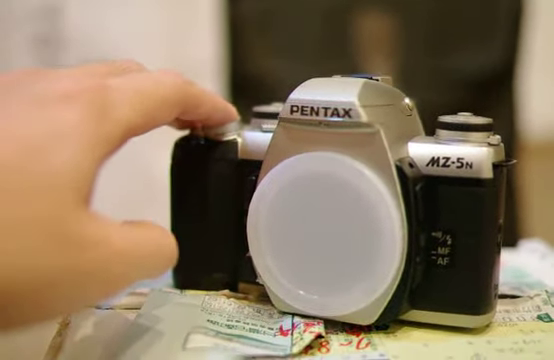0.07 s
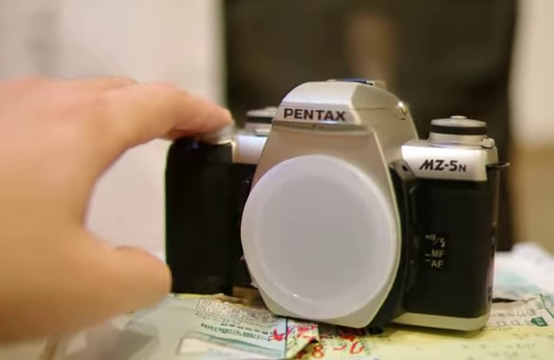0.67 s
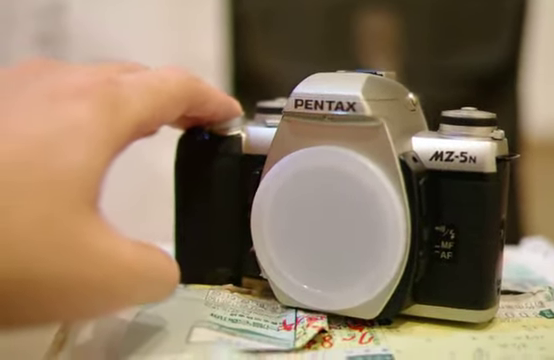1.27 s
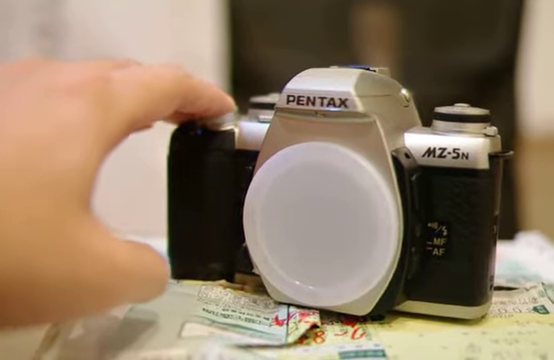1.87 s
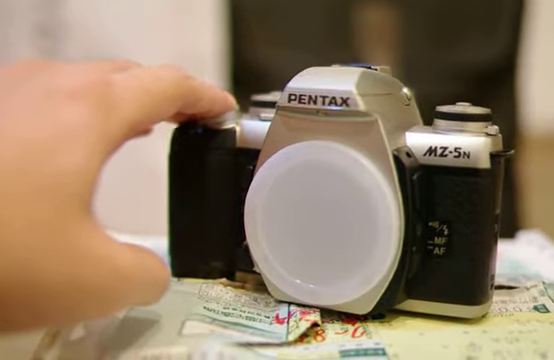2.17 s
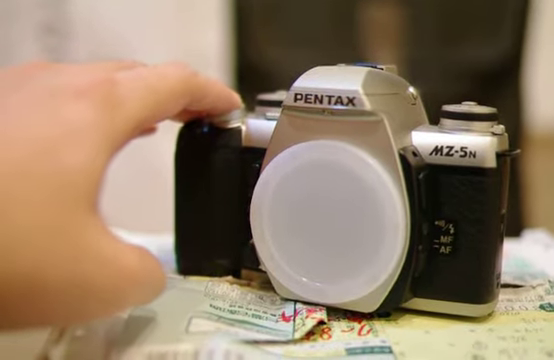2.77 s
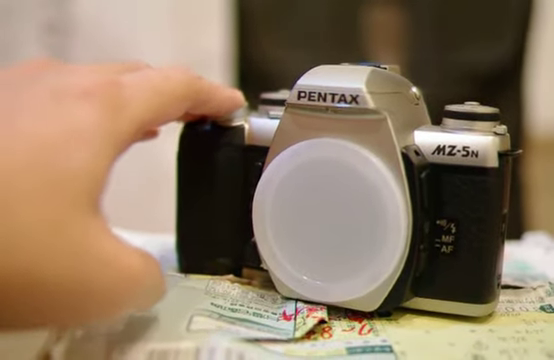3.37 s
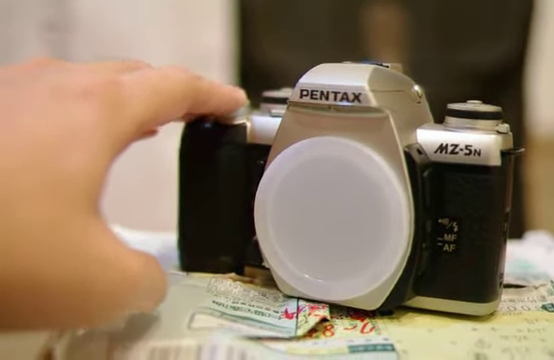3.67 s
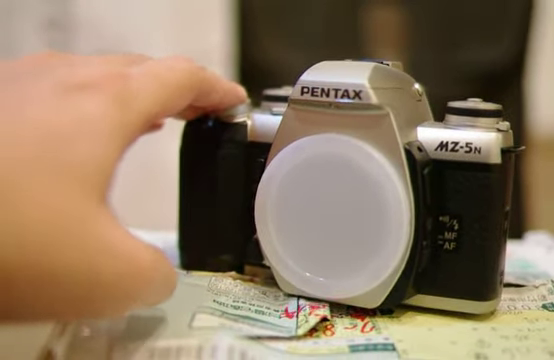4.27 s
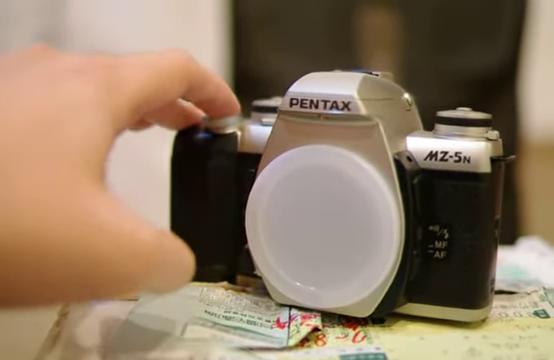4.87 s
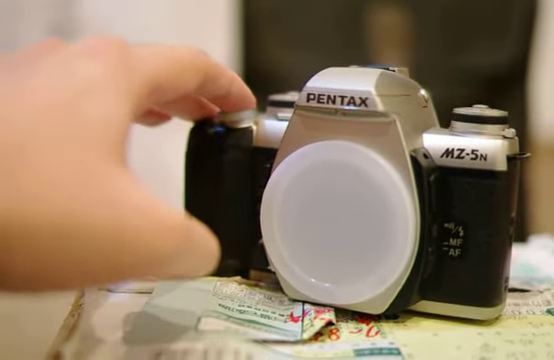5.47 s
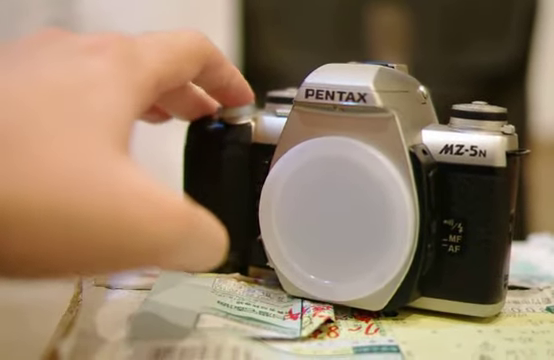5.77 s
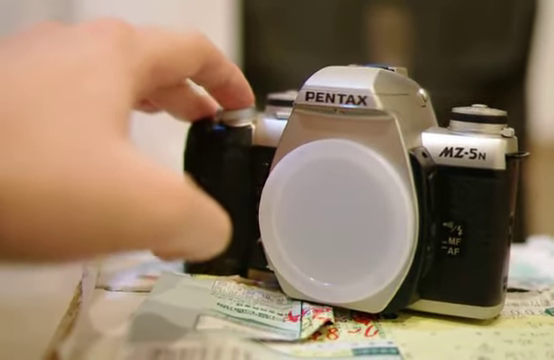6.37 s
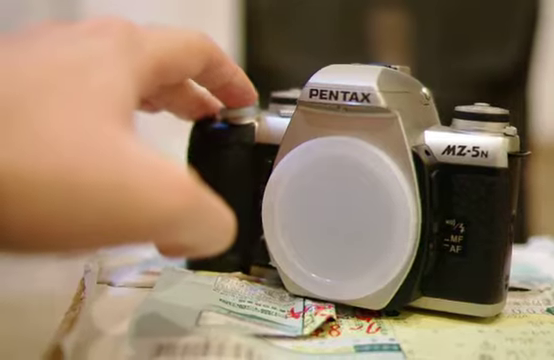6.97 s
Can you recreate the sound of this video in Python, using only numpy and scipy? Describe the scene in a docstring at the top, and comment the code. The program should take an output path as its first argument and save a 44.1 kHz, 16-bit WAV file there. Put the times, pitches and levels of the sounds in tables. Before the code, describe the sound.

Four close, unevenly spaced camera shutter snaps with short whining film winds, over a soft, steady rush of air.

```python
"""A small quiet room, the microphone close to a motor-driven film SLR on a table. It fires four times.
In each cycle a latch lets go, the mirror swings up, the shutter snaps and the mirror slaps down,
then the motor winds on with whining gears until it runs into its stop. Each blow rings the part
it hits, and jolts rock the body on the table. Between the second and third shots the release
button ticks faintly under the finger. Behind it all is a steady rush of air."""
import sys
import numpy as np
from scipy import signal
from scipy.fft import rfft, irfft
from scipy.io import wavfile
from scipy.ndimage import uniform_filter1d

SR = 44100
rng = np.random.default_rng(int(sys.argv[2]) if len(sys.argv) > 2 else 0)


def file_out(sig):
    """Save sig as 16-bit WAV at sys.argv[1]."""
    # one column per channel
    cols = np.atleast_2d(sig).T
    # limit, then scale
    lim = np.clip(cols, -1, 1)
    pcm = np.round(lim * 32767).astype(np.int16)
    wavfile.write(sys.argv[1], SR, pcm)


N = 309582
FFT_SIZE = 8192
LEAD_S, CYCLE_S = .2, .7  # times within a cycle count from the mirror's landing, LEAD_S into it


def undb(db):
    """Decibels to gain."""
    return 10 ** (np.asarray(db) / 20)


def unit(x):
    """Scale to an rms of 1."""
    return x / np.sqrt(np.mean(x ** 2))


def freqs(size):
    """Bin frequencies of a transform, kept above zero."""
    return np.maximum(np.fft.rfftfreq(size, 1 / SR), 1)


def add(out, x, start_s):
    """Mix x into out from a given time on."""
    k = int(round(start_s * SR))
    x = x[max(-k, 0):len(out) - k]
    out[max(k, 0):max(k, 0) + len(x)] += x


def walk(size, count):
    """Random wander, smoothed over count samples, with an rms of 1."""
    return unit(uniform_filter1d(rng.standard_normal(size), size=count))


def fall(t, from_s, db_per_s):
    """Gain that holds at 1 until a given time, then falls steadily."""
    return undb(-db_per_s * np.maximum(t - from_s, 0))


def drive(t, start_s, length_s, fall_db_per_s, engage_s=.0078):
    """Envelope of a driven part: it engages, holds and coasts down."""
    return np.clip((t - start_s) / engage_s, 0, 1) * fall(t, start_s + length_s, fall_db_per_s)


def contacts(size, spread_db):
    """Dense tiny contacts of very unequal strength."""
    return unit(rng.standard_normal(size) * undb(spread_db * rng.standard_normal(size)))


def ring(push, modes, tilt_db=0, knee_hz=2000, lowest_hz=150):
    """A push rings a part's resonances; harder contacts lift the treble by tilt_db per octave."""
    f = freqs(FFT_SIZE)
    power = sum(undb(db) ** 2 / (1 + ((f * f - hz * hz) / (f * width)) ** 2 / 2) ** 2
                for hz, width, db in modes)
    power /= 1 + (lowest_hz / f) ** 4  # almost no bass comes through
    gain = np.sqrt(power) * undb(tilt_db * np.log2(np.maximum(f, knee_hz)))
    # minimum phase, so nothing rings before the push
    cepstrum = irfft(np.log(gain / gain.max() + 1e-5))
    cepstrum[1:FFT_SIZE // 2] *= 2
    cepstrum[FFT_SIZE // 2 + 1:] = 0
    response = irfft(np.exp(rfft(cepstrum)))
    return signal.fftconvolve(push, response / np.linalg.norm(response))[:len(push)]


def strike(t, blows, modes, chatter_db, slop_s=.00015):
    """Each blow is one hard contact and a dying chatter of loose parts, ringing the resonances."""
    out = np.zeros(len(t))
    age = np.arange(FFT_SIZE // 2) / SR
    for s, db, chatter_s, tilt_db in blows:
        chatter = contacts(len(age), spread_db=2) * np.exp(-age / chatter_s)
        push = chatter * undb(chatter_db)
        push[0] -= 1  # the hard contact
        sound = ring(push, modes, tilt_db)
        sound /= np.linalg.norm(sound)  # springs deliver the same energy every time
        add(out, undb(db) * sound, s + LEAD_S + slop_s * rng.standard_normal())
    return out


# Room tone, all around the microphone. Each row: frequency in Hz, relative spectral level in dB.
AIR_SPECTRUM = [(25, -50), (50, -20.5), (86, -16), (110, -6.5), (150, -6.5), (185, -0.5), (350, 0),
                (540, -2), (800, -1.5), (1150, -6), (2100, -8.5), (5000, -15.5), (13900, -23.5),
                (15800, -29)]
# The ducts, faint in the room tone. Each row: resonance in Hz, width in Hz, relative level in dB.
DUCT_MODES = [(664, 63, -0.5), (870, 58, -2), (1375, 66, -4.5), (2291, 80, 1), (2540, 89, -4),
              (3230, 110, -6), (3600, 120, -10.5), (5470, 73, -10)]


def room_tone(rush_db=-53.5, duct_db=-63):
    """Air rushes steadily, faintly coloured by narrow duct resonances."""
    hz, db = np.transpose(AIR_SPECTRUM)
    colour = undb(np.interp(np.log(freqs(N)), np.log(hz), db))
    rush = irfft(rfft(rng.standard_normal(N)) * colour, N)
    ducts = ring(rng.standard_normal(N), DUCT_MODES)
    return undb(rush_db) * unit(rush) + undb(duct_db) * ducts


# The latch, close to the microphone, after a magnet's tick. Each row: start in seconds, relative energy in dB,
# # chatter time constant in seconds, treble tilt in dB per octave.
LATCH_CLICKS = [(-.138, -28, .001, -1), (-.0924, -9, 0.0019, 2.5), (-.089, -17, 0.005, 2)]
# Its ring. Each row: resonance in Hz, width in Hz, relative level in dB.
LATCH_MODES = [(748, 85, -14.5), (1070, 180, 4), (1640, 690, -6), (2245, 120, 6), (2950, 500, -9),
               (4428, 940, -13), (6200, 210, -13), (7400, 280, -11), (10150, 2000, -11.5),
               (12100, 867, -7.5)]


def latch(t):
    """A magnet ticks to open the cycle, then the latch lets go with small clicks."""
    return strike(t, LATCH_CLICKS, LATCH_MODES, chatter_db=-10)


# The gears, close up: they take up slack, lift the mirror, idle, spin up, wind, ease off and run out.
# Each row: start in seconds, length in seconds, relative level in dB, swell over the run in dB,
# sharpness of the tooth contacts in dB.
GEAR_TRAIN_RUNS = [(-.109, .018, -49, -4, 2), (-.089, 0.052, -34.5, 5, -0.5), (-.03, 0.049, -44, 3, 4),
                   (.024, .026, -43, 2, -6), (0.047, 0.09, -37.5, 0, 3), (0.136, 0.034, -39, 4.5, 0),
                   (0.186, 0.036, -35.5, -1, -1.5)]
# The housing around them. Each row: resonance in Hz, width in Hz, relative level in dB.
HOUSING_MODES = [(210.5, 34.4, -2.5), (295, 37, -6), (335, 22, -7), (490, 24, -12), (630, 66, -6),
                 (766, 104, -6), (985, 67, 3), (1208, 173, 1.5), (1490, 280, -3), (2005, 70, -2.5),
                 (2240, 1140, -5.5), (2396, 87, -0.5), (3190, 230, -5), (3900, 159, -12.5),
                 (4180, 260, -8.5), (4907, 860, -13), (6170, 410, -13), (7040, 438, -16),
                 (9340, 3900, -15.5), (11560, 1400, -9.5), (12140, 384, -7), (13226, 533, -12.5)]


def gear_train(t, coast_db_per_s=482, dulling_db_per_s=200):
    """Teeth rattle the housing in each run, swelling as a spring tightens and dulling as they coast."""
    low_gain, treble_gain = np.zeros(len(t)), np.zeros(len(t))
    for start_s, length_s, db, swell_db, sharp_db in GEAR_TRAIN_RUNS:
        progress = np.clip((t - start_s) / length_s, 0, 1)
        force = undb(db + swell_db * (progress - .5)) * drive(t, start_s, length_s, coast_db_per_s)
        sharpness = undb(sharp_db) * fall(t, start_s + length_s, dulling_db_per_s)
        low_gain = np.hypot(low_gain, force)
        treble_gain = np.hypot(treble_gain, force * sharpness)
    rattle = ring(contacts(len(t), spread_db=4), HOUSING_MODES)
    low = signal.sosfiltfilt(signal.butter(2, 4000, fs=SR, output="sos"), rattle)
    return low_gain * low + treble_gain * (rattle - low)


# The body against the table, near the microphone. Each row: start in seconds, relative level in dB.
BODY_JOLTS = [(-.081, -41.5), (-.045, -49), (.002, -33.5), (.127, -40.5), (0.164, -50)]


def table_thump(t, hz=208, t60=.12, rise_s=.0044):
    """The body rocks on the table in one low mode after each jolt."""
    out = np.zeros(len(t))
    for s, db in BODY_JOLTS:
        age = np.maximum(t - s, 0)
        detune = 1 + .0093 * rng.standard_normal()
        envelope = (1 - np.exp(-age / rise_s)) * np.exp(-np.log(1000) * age / t60)
        out += undb(db) * envelope * np.sin(2 * np.pi * hz * detune * age)
    return out


# The shutter, crisp at this short distance. Each row: start in seconds, relative energy in dB,
# chatter time constant in seconds, treble tilt in dB per octave.
CURTAIN_SNAPS = [(-.053, -19, .003, 5), (-.0473, -1, 0.0015, 0.9), (-.0457, -7.5, 0.0017, -2),
                 (-.041, -11, 0.0068, 11), (-.032, -11, .004, 11)]
# Its ring. Each row: resonance in Hz, width in Hz, relative level in dB.
SHUTTER_MODES = [(212, 110, -21), (357, 170, -15), (570, 61, -28), (805, 87, -8), (910, 74, -18),
                 (1100, 271, -14), (2090, 530, -1.5), (2770, 119, -5), (3330, 250, 0.5), (3968, 240, -10),
                 (4840, 330, 2), (6020, 200, -1.5), (8250, 2400, -11), (9020, 250, -4), (9800, 580, -0.5),
                 (11850, 1900, -1.5), (13035, 237, -6)]


def shutter(t):
    """The two curtains snap across and their blades shiver."""
    return strike(t, CURTAIN_SNAPS, SHUTTER_MODES, chatter_db=-5)


# The mirror, a deeper clack just in front of the microphone. Each row: start in seconds,
# relative energy in dB, chatter time constant in seconds, treble tilt in dB per octave.
MIRROR_SLAPS = [(-.0001, -2.5, 0.00055, -2.5), (.0035, -8, 0.0018, 3), (.0052, -9.5, 0.003, -1),
                (.012, -13.5, 0.0045, -2), (.131, -15, .0015, 5), (.224, -21.5, 0.0052, -6)]
# Its ring. Each row: resonance in Hz, width in Hz, relative level in dB.
MIRROR_MODES = [(206.7, 22, 5.5), (296, 42, -11), (314, 43, -12), (469, 33, -3.5), (556, 30, -7),
                (747, 105, -4), (1003, 93, -5.5), (1158, 130, -4.5), (2120, 930, -2), (2850, 140, -5.5),
                (2982, 64, -10), (3170, 140, -3), (4262, 130, -17), (4700, 270, -10), (6221, 700, -16),
                (9653, 1800, -14), (11936, 1500, -15.5)]


def mirror(t):
    """The mirror lands and bounces; later its linkage is cocked again."""
    return strike(t, MIRROR_SLAPS, MIRROR_MODES, chatter_db=-17)


# The winder's whine, close up. Each row: multiple of the shaft rate, relative level in dB.
WHINE_TONES = [(5, -13), (8, -7.5), (9, -4.5), (12, -6), (24, -5.5), (36, -8), (48, -0.5)]


def motor(t, start_s=.05, length_s=.074, whine_db=-40.5):
    """The winding motor sags under the film's pull; its gears whine on multiples of the shaft rate."""
    free_hz, sag_hz, pull_after_s, pull_width_s = 265.5, 19, .043, .042
    flutter, roughness, slip_rad, runout, pinion_teeth = .0077, .47, .52, .2, 12
    age = t - start_s
    pull = np.exp(-((age - pull_after_s) / pull_width_s) ** 2)
    shaft_hz = (free_hz - sag_hz * pull) * (1 + flutter * walk(len(t), count=60))
    turns = np.cumsum(shaft_hz) / SR
    pinion_gain = undb(7) * fall(age, from_s=.04, db_per_s=550)  # sings out early, then beds in
    whine = np.zeros(len(t))
    for multiple, db in WHINE_TONES:
        # play between the teeth makes each tone shake in phase and strength
        phase = 2 * np.pi * (multiple * turns + rng.random()) + slip_rad * walk(len(t), count=200)
        strength = undb(db) * (1 + roughness * walk(len(t), count=160))
        if multiple == pinion_teeth:
            strength *= pinion_gain
        whine += strength * np.sqrt(2) * np.sin(phase)
    whine *= 1 + runout * np.sin(2 * np.pi * turns)  # an off-centre pinion presses harder once a turn
    return whine * undb(whine_db) * drive(t, start_s, length_s, fall_db_per_s=600)


# The pawl, close up, scraping before the stop and settling after it. Each row: start in seconds,
# relative energy in dB, chatter time constant in seconds, treble tilt in dB per octave.
PAWL_SCRAPES = [(.123, -7, 0.015, -10.5), (0.206, -16, .005, 1.5), (0.219, -23, .005, -8),
                (0.265, -20, 0.0013, -5)]
# The ring of the stop. Each row: resonance in Hz, width in Hz, relative level in dB.
STOP_MODES = [(312, 30, -2.5), (701, 36, -15.5), (803, 41, -23), (990, 121, -10.5), (1224, 91, -7.5),
              (1475, 97, -1.5), (1790, 490, 0.0), (2930, 1140, -5.5), (5050, 200, -9), (6140, 900, -17),
              (7240, 230, -10), (9984, 3000, -15.5), (10800, 560, -8), (12100, 482, -6), (13135, 604, -20)]


def winder_stop(t, crash_s=.1752, gap_s=.0025, chatter_s=.0041):
    """The pawl scrapes and the winder judders into its stop, each blow harder and duller than the last."""
    first_db, swell_db = -5.5, .5
    tilt_db, dulling_db = 1.6, .94  # per octave
    judder = [(crash_s + k * gap_s, first_db + k * swell_db, chatter_s, tilt_db - k * dulling_db)
              for k in range(5)]
    return strike(t, PAWL_SCRAPES + judder, STOP_MODES, chatter_db=-11)


# The release button, faint even this close.
# Each row: start in seconds into the scene, relative energy in dB.
RELEASE_TICKS = [(2.892, -24.5), (3.628, -35), (3.925, -26)]


def release_button(decay_s=.0065):
    """The button creaks under the finger in short soft ticks that ring the housing."""
    push = np.zeros(N)
    age = np.arange(FFT_SIZE // 2) / SR
    for s, db in RELEASE_TICKS:
        tick = contacts(len(age), spread_db=6) * np.exp(-age / decay_s)
        add(push, undb(db) * tick / np.linalg.norm(tick), s)
    return ring(push, HOUSING_MODES, tilt_db=-4)


def exposure():
    """One whole cycle of the mechanism."""
    t = np.arange(int(CYCLE_S * SR)) / SR - LEAD_S
    blows = latch(t) + shutter(t) + mirror(t) + winder_stop(t)
    return blows + table_thump(t) + gear_train(t) + motor(t)


def room(direct, wet_db=-9, t60=.26, gap_s=.0044):
    """The small room's diffuse reflections reach the microphone just after the direct sound."""
    age = np.arange(SR // 2) / SR
    tail = rng.standard_normal(len(age)) * np.exp(-np.log(1000) * age / t60)
    tail *= np.clip(age / gap_s - 1, 0, 1)
    return direct + undb(wet_db) * signal.fftconvolve(direct, tail / np.linalg.norm(tail))[:N]


# The four shots, all from the same spot on the table.
# Each row: the mirror's landing in seconds into the scene, gain in dB.
EXPOSURES = [(.1493, -1.5), (2.106, -1.5), (5.4040, -1.55), (6.6446, -1.5)]


def scene():
    """Four exposures and the button at one close microphone, over the room tone."""
    camera = release_button()
    for s, db in EXPOSURES:
        add(camera, undb(db) * exposure(), s - LEAD_S)
    return (room(camera) + room_tone())[None]


def record(dry, top_hz=15750):
    """The recorder cuts the top steeply."""
    return signal.sosfilt(signal.ellip(10, .2, 80, top_hz, fs=SR, output="sos"), dry)


dry = scene()
out = record(dry)
file_out(out)
```